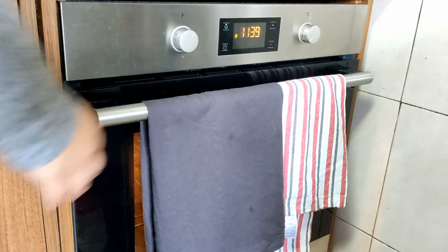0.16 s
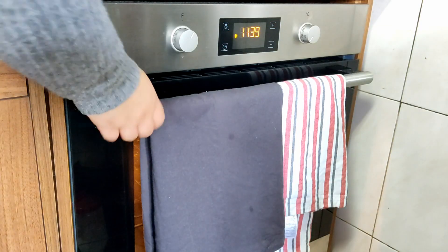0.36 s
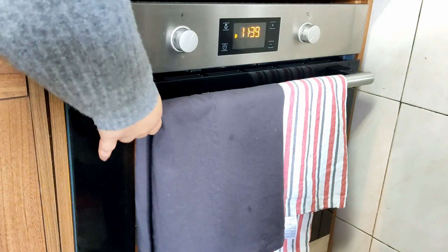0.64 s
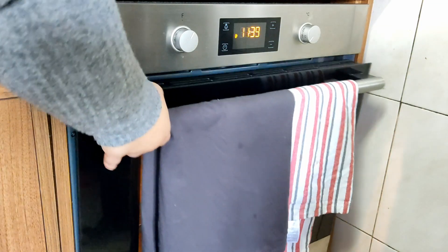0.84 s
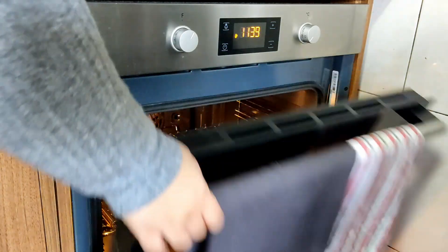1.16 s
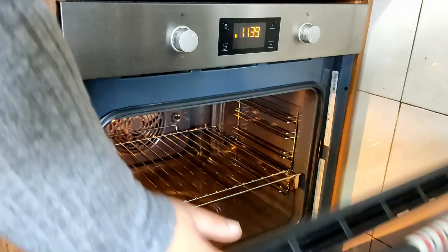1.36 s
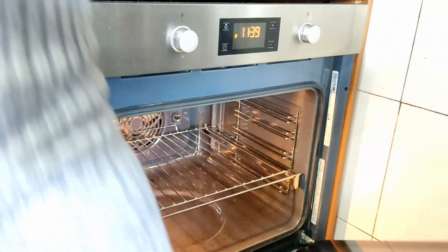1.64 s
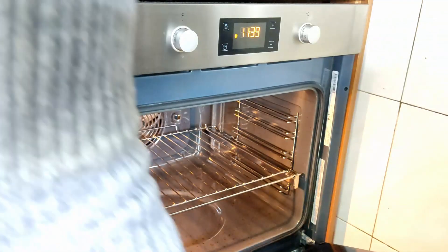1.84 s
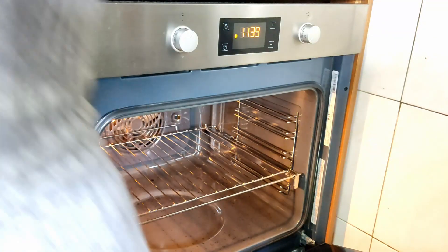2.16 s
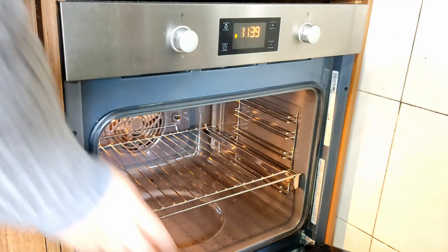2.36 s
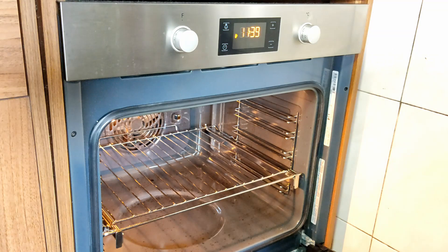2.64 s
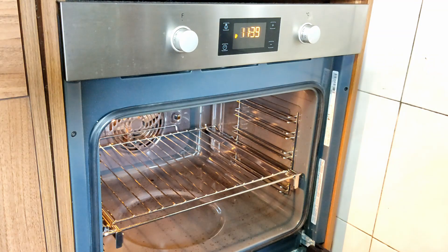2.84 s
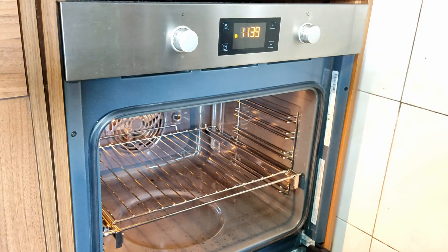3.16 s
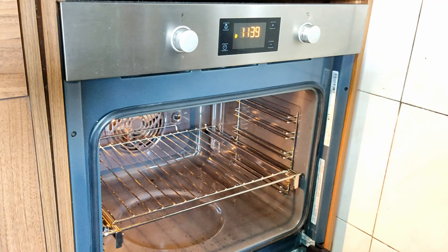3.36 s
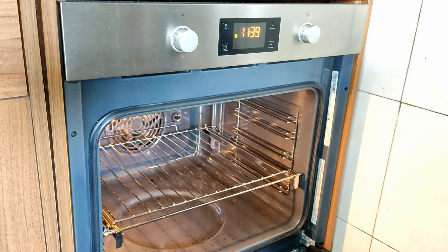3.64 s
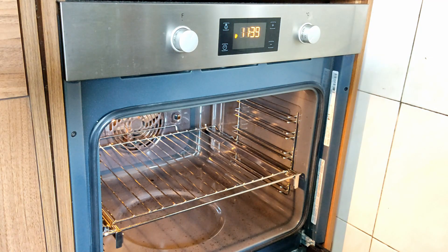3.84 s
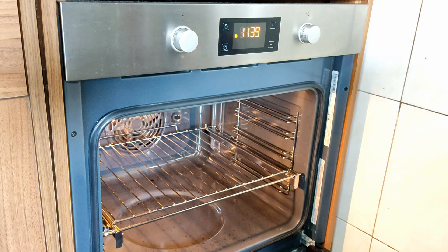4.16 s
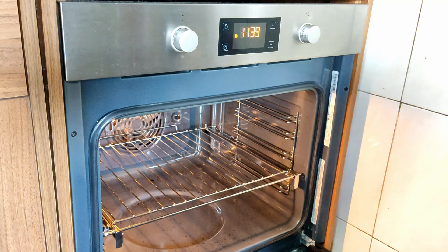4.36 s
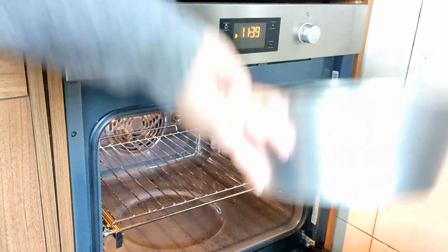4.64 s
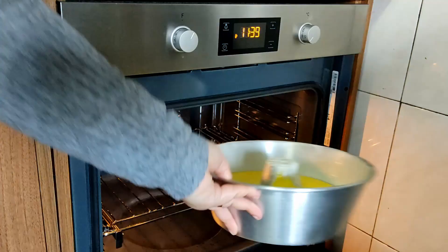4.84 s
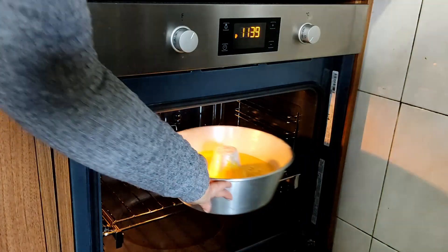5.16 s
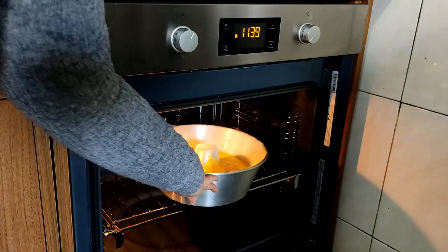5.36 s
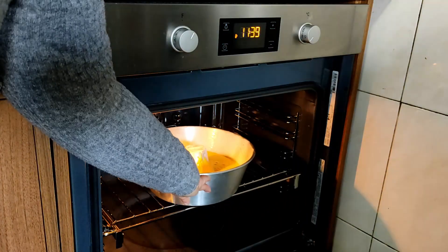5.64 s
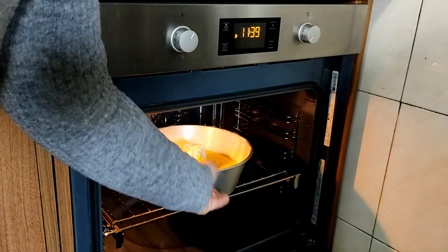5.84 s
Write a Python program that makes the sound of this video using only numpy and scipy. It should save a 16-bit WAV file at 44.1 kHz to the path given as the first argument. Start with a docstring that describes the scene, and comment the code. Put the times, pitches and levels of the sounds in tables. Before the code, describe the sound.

A quiet oven fan hums under rustling sleeves. After a light tap and a sharp grip on the handle, an oven door scrapes off its seal and falls heavily onto its stops, the loudest moment. Small clicks, scuffs and wooden bumps come and go. Near the end a heavy, filled metal tin is set on the rack in two short, damped clatters. Small microphone nearby, short bright room reverberation.

```python
"""A kitchen heard through a small two-port microphone, with an oven fan (coloured noise) and rustling cloth throughout.
After a light knock an oven door is gripped, rubs on its sprung hinge and drops onto its stops: noise bursts ring modes.
Clicks, soft scuffs (bands of noise), worktop knocks, cupboard thumps and a metal tick follow; the floor booms at times.
Last, a full cake tin lands twice on the wire rack. Decaying noise gives the tiled room's answer to blows and scuffs.
"""
import sys
import numpy as np
from scipy import signal
from scipy.fft import rfft, irfft, next_fast_len
from scipy.io import wavfile
from scipy.ndimage import uniform_filter1d

SR = 44100
rng = np.random.default_rng(int(sys.argv[2]) if len(sys.argv) > 2 else 0)


def transcribe(u):
    """Save the signal u as a 16-bit wav file named by the first command-line argument.

    u: samples, shape (n,) or (channels, n), limited to [-1, 1]; the rate is SR.
    q: integer samples, one column per channel.
    """
    v = np.clip(np.atleast_2d(u).T, -1, 1)
    q = np.round(v * 32767).astype(np.int16)
    wavfile.write(sys.argv[1], SR, q)


N = 264820  # length [samples]
# All levels are those at the source, ahead of the microphone's response.


def amp(db):
    """Decibel law: the amplitude gain of a level."""
    return 10 ** (np.asarray(db) / 20)


def unit(x):
    """Power normalisation: x scaled to rms 1."""
    return x / np.sqrt(np.mean(x ** 2) + 1e-20)


def along(points, hz, column=1):
    """Logarithmic frequency scale: a column of (frequency, value ..) points interpolated at hz."""
    points = np.asarray(points)
    return np.interp(np.log(hz + 1), np.log(points[:, 0] + 1), points[:, column])


def tilt(hz, slope_db):
    """Spectral slope: dB at hz for a slope per octave around 1 kHz, level below 100 Hz."""
    return slope_db * np.log2(np.maximum(hz, 100) / 1000)


def curve(rows):
    """Amplitude envelope: a (time [s], level [dB]) table as gain per sample, silent outside."""
    s, db = np.transpose(rows)
    return amp(np.interp(np.arange(N) / SR, s, db, left=-150, right=-150))


def filtered(x, response):
    """Linear filtering: the spectrum of x times a response of frequency."""
    n = x.shape[-1]
    padded = next_fast_len(n + 4096)
    spectrum = rfft(x, padded)
    return irfft(spectrum * response(np.fft.rfftfreq(padded, 1 / SR)), padded)[..., :n]


def paired(noises, spectrum, alike):
    """Interaural coherence: two unrelated noises, coloured, mixed to a left-right likeness."""
    def mid_side(hz):
        angle = np.arccos(np.clip(along(alike, hz), -1, 1)) / 2
        return amp(along(spectrum, hz)) * np.array([np.cos(angle), np.sin(angle)])

    mid, side = filtered(noises, mid_side)
    return np.array([mid + side, mid - side])


def rush(spectrum, alike, patchy_db):
    """Random modulation: stereo noise, rms 1, with patches of random gain in time and frequency."""
    z = signal.stft(rng.standard_normal((2, N + 512)), nperseg=512)[2]
    patches = uniform_filter1d(rng.standard_normal(z.shape[1:]), size=6, axis=0)
    patches = uniform_filter1d(patches, size=10, axis=1)
    noises = signal.istft(z * amp(patchy_db * unit(patches)), nperseg=512)[1][:, :N]
    return unit(paired(noises, spectrum, alike))


def ringing(modes, t, scatter_db, slope_db=0, wander=0):
    """Modal superposition: damped sines, nominal summed power 1 at the start, scattered anew each call."""
    hz, db, t60 = np.transpose(modes)[:, :, None]
    size = amp(db + tilt(hz, slope_db))
    chance = amp(scatter_db * rng.standard_normal(hz.shape))
    # a random walk of phase smears each mode over the share `wander` of its pitch
    steps = rng.standard_normal((len(hz), len(t)))
    drift = np.sqrt(2 * np.pi * wander * hz / SR) * np.cumsum(steps, axis=1)
    decay = amp(-60 * t / t60)
    ring = size * chance * decay * np.sin(2 * np.pi * hz * t + drift)
    return ring.sum(axis=0) / np.sqrt(np.sum(size ** 2) / 2)


# reverberation time of the room: (frequency [Hz], t60 [s])
ROOM_DECAY = [(60, 1), (300, 0.39), (1000, 0.4), (4000, 0.4), (10000, 0.32)]
# colour of the tail; a small room answers bass weakly: (frequency [Hz], relative level [dB])
ROOM_COLOUR = [(60, -8), (300, 5), (1000, -1.5)]
# coherence of diffuse sound: (frequency [Hz], left-right likeness [-1 to 1])
LIKENESS = [(60, 0.59), (180, 1), (550, 0.4), (1650, 0.0025), (5000, -0.028)]


def in_room(crack, ring, pan_db, wet_db, push=None):
    """Reverberation: direct sound plus a fresh noise tail, each frequency dying at its own speed."""
    hz, t, z = signal.stft(rng.standard_normal((2, len(crack))), SR, nperseg=256)
    decay = amp(-60 * t / along(ROOM_DECAY, hz)[:, None])
    tail = signal.istft(z * decay, SR, nperseg=256)[1]
    tail = paired(tail, ROOM_COLOUR, LIKENESS)
    tail = np.pad(tail / np.linalg.norm(tail[0]), ((0, 0), (round(.004 * SR), 0)))  # starts 4 ms late
    # ring and thud enter the room tail 10 dB lower, so their tones stay clear and steady
    sent = (crack if push is None else push) + amp(-10) * ring
    wet = signal.fftconvolve(sent[None], tail, axes=1)[:, :len(crack)]
    late_left = np.roll(crack + ring, shift=12)  # 12 samples later on the left
    direct = np.array([late_left, crack + ring]) * amp([[pan_db / 2], [-pan_db / 2]])
    return direct + amp(wet_db) * wet


WANDER = 0.025  # loose panels: smear as a share of pitch
# contact noise before the tilt: (frequency [Hz], relative density [dB per Hz])
CRACK_COLOUR = [(150, -39.5), (500, -4), (1000, 0.5), (2500, -7), (5000, -2), (9000, -1), (16000, -28)]
# modes of the cabinet carcass, the default under a blow: (frequency [Hz], relative level [dB], t60 [s])
CABINET_MODES = [(105.4, 7.5, 0.27), (121, -7.5, 0.16), (157.3, -5, 0.56)]


def blows(rows, modes, contact_s, wet_db, under=CABINET_MODES, top_hz=np.inf, wander=WANDER):
    """Impact excitation: a contact-long noise burst, the object's ring and a thud in what is under it.

    Rows: (time [s], crack, ring, thud [dB before their envelopes], hardness [dB/octave], left-right [dB]).
    """
    out = np.zeros((2, N + SR))
    t = np.arange(round(.55 * SR)) / SR
    swell = 1 - np.exp(-3 * t / contact_s)  # a long contact builds up gradually
    for s, crack_db, ring_db, thud_db, slope_db, pan_db in rows:
        def colour(hz):
            return amp(along(CRACK_COLOUR, hz) + tilt(hz, slope_db)) / (1 + (hz / top_hz) ** 6)

        noise = unit(filtered(rng.standard_normal(len(t)), colour))
        crack = amp(crack_db) * swell * np.exp(-t / contact_s) * noise
        # the walls get the crack's even colour as one pulse of equal energy
        push = filtered(1. * (np.arange(len(t)) == round(contact_s * SR)), colour)
        push *= np.linalg.norm(crack) / np.linalg.norm(push)
        ring = ringing(modes, t, scatter_db=2.2, slope_db=slope_db, wander=wander)
        thud = ringing(under, t, scatter_db=2.2, wander=2 * WANDER)
        body = amp(ring_db) * swell * ring + amp(thud_db) * swell ** 2 * thud
        start = round(s * SR)
        out[:, start:start + len(t)] += in_room(crack, body, pan_db, wet_db, push)
    return out[:, :N]


FAN_DB = -52.5  # rms level
# low hum and air noise of the fan: (frequency [Hz], relative density [dB per Hz])
FAN_COLOUR = [(20, -42), (36, 7), (43, 7), (52, -41), (71, -6), (160, -10), (200, 1), (245, -3.5),
              (450, -9), (665, -16), (826, -18.5), (1420, -42), (5000, -50), (16000, -60)]


def fan():
    """Flow noise: the oven fan as a narrow low hum and broad air noise."""
    return amp(FAN_DB) * rush(FAN_COLOUR, LIKENESS, patchy_db=2.0)


# clothing movement: (time [s], level [dB])
RUSTLE_LEVEL = [(0, -61.5), (.6, -60), (1.6, -57), (2.08, -65.5), (2.11, -54), (2.19, -53.5), (2.25, -64),
                (2.55, -61.5), (2.9, -52.5), (3.15, -58.5), (3.5, -53.5), (3.9, -60.5), (4.2, -57.5),
                (4.5, -60.5), (4.8, -57.5), (5.2, -64.5), (6, -64)]
# cloth friction: (frequency [Hz], relative density [dB per Hz])
CLOTH_COLOUR = [(300, -8), (1000, 3.5), (2000, -1.5), (4000, 4), (8000, 9), (16000, 2)]


def clothing():
    """Friction noise: a soft wide rustle that swells with each movement."""
    return curve(RUSTLE_LEVEL) * rush(CLOTH_COLOUR, LIKENESS, patchy_db=1.5)


# the floor takes weight: (time [s], level before the swell [dB])
FLOOR_LOADS = [(0.72, -39.5), (1.176, -31), (1.25, -23), (2.93, -42), (3.101, -42)]
# lowest mode of the floor: (frequency [Hz], relative level [dB], t60 [s])
FLOOR_MODE = [(49.7, 0, 0.35)]


def booms():
    """Low-frequency resonance: the floor swings slowly into its lowest mode, alike at both ports."""
    out = np.zeros(N + SR)
    t = np.arange(SR // 2) / SR
    swell = 1 - np.exp(-t / 0.013)
    for s, db in FLOOR_LOADS:
        start = round(s * SR)
        out[start:start + len(t)] += amp(db) * swell * ringing(FLOOR_MODE, t, scatter_db=1.5)
    return out[:N]


# soft rubs: (time [s], length [s], noise level before the swell [dB], centre [Hz], half-width [Hz])
SOFT_RUBS = [(2.083, 0.064, -70, 2720, 145), (2.19, 0.023, -65, 1470, 500),
             (2.406, 0.027, -65.5, 1150, 500), (2.432, 0.018, -60.5, 1440, 900),
             (2.865, 0.027, -55, 1600, 1500), (3.728, 0.094, -64.5, 1770, 1620),
             (3.978, 0.03, -65, 1930, 250), (3.979, 0.017, -56.5, 950, 300), (5.303, 0.024, -64, 2420, 690)]


def scuffs():
    """Band-limited friction: short soft swells of noise around a centre frequency."""
    out = np.zeros((2, N + SR))
    t = np.arange(SR // 2) / SR
    for s, length_s, db, centre_hz, width_hz in SOFT_RUBS:
        def band(hz):
            return np.exp(-((hz - centre_hz) / width_hz) ** 2)

        noise = unit(filtered(rng.standard_normal(len(t)), band))
        swell = np.sqrt(np.abs(np.sin(np.pi * np.minimum(t / length_s, 1))))
        rub = amp(db) * swell * noise
        start = round(s * SR)
        out[:, start:start + len(t)] += in_room(rub, 0 * t, pan_db=1.5, wet_db=-7)
    return out[:, :N]


CLICK_CONTACT_S, KNOCK_CONTACT_S, THUMP_CONTACT_S = 0.0033, .0035, 0.00303
KNOCK_TOP_HZ = 4600  # the crack on wood falls away steeply above this
KNOCK_WANDER = .01  # the worktop rings more cleanly than loose panels
THUMP_CRACK_DB, THUMP_THUD_DB = -15, -14.5  # relative to the ring
THUMP_HARD_DB = -7.5  # hardness [dB/octave]
# light knocks on the worktop: (time [s], crack [dB], ring [dB], hardness [dB/octave], left-right [dB])
WORKTOP_KNOCKS = [(.16, -49.5, -61, -9, 13), (1.844, -49, -57, -2, 13), (2.9158, -34.5, -42, 0, 6),
                  (2.921, -39, -31, -8.5, -4), (3.302, -46, -49, -16, 3), (3.31, -45.5, -44, -7, 4)]
# metal tick: columns as for the knocks
METAL_TICKS = [(4.581, -37.5, -42.5, 2.2, 9.1)]
# dry clicks: (time [s], crack [dB], hardness [dB/octave], left-right [dB])
DRY_CLICKS = [(1.775, -34, 5, 9), (1.782, -32, -0.5, 6), (1.790, -28, 6.5, 10.5),
              (3.179, -33.5, 28.5, 13.5), (3.899, -53.5, 8, -29), (4.584, -33.5, 20.5, 29),
              (4.592, -30.5, 26, 21), (5.006, -47, 2.5, -15), (5.202, -50.5, 10, 19),
              (5.309, -51.5, 2.5, -12)]
# dull blows on the cupboard: (time [s], ring [dB])
CUPBOARD_THUMPS = [(2.890, -25.5), (3.033, -33), (3.246, -38.5)]
# modes of worktop, small metal part and cupboard: (frequency [Hz], relative level [dB], t60 [s])
WORKTOP_MODES = [(826, -3, 0.11), (1035, -5.5, 0.063), (1348, -1, 0.051), (1777, -6, 0.075),
                 (2940, -8, .06), (4050, -6, 0.037)]
CLASP_MODES = [(1715, -4.5, 0.13), (2140, -7.5, 0.08), (5540, 6, 0.075)]
CUPBOARD_MODES = [(338, 3, 0.038), (480, 12, 0.022)]


def small_sounds():
    """Selective excitation: knocks ring the worktop, thumps the cupboard, a tick metal; clicks nothing."""
    none = -np.inf
    knocks = [(s, db, ring_db, none, slope_db, pan_db)
              for s, db, ring_db, slope_db, pan_db in WORKTOP_KNOCKS]
    clicks = [(s, db, none, none, slope_db, pan_db) for s, db, slope_db, pan_db in DRY_CLICKS]
    thumps = [(s, db + THUMP_CRACK_DB, db, db + THUMP_THUD_DB, THUMP_HARD_DB, 0)
              for s, db in CUPBOARD_THUMPS]
    ticks = [(s, db, ring_db, none, slope_db, pan_db)
             for s, db, ring_db, slope_db, pan_db in METAL_TICKS]
    out = blows(ticks, CLASP_MODES, CLICK_CONTACT_S, wet_db=6.0)
    out += blows(knocks, WORKTOP_MODES, KNOCK_CONTACT_S, wet_db=1.0,
                 top_hz=KNOCK_TOP_HZ, wander=KNOCK_WANDER)
    out += blows(clicks, WORKTOP_MODES, CLICK_CONTACT_S, wet_db=4.5)
    return out + blows(thumps, CUPBOARD_MODES, THUMP_CONTACT_S, wet_db=3.0)


TIN_CONTACT_S, TIN_PAN_DB, TIN_WANDER = 0.0045, 2.3, .01
# contacts of tin and rack: (time [s], crack [dB], ring [dB], thud [dB], hardness [dB/octave])
TIN_CONTACTS = [(5.517, -33, -40.5, -67, -1), (5.533, -29, -32, -60, -0.5), (5.552, -38.5, -33.5, -37, -9),
                (5.575, -41.5, -49, -38.5, -9.5), (5.597, -34.5, -37, -45, -1.5),
                (5.626, -59, -51, -45, -16), (5.645, -54, -53, -38.5, -9), (5.685, -42.5, -49, -51, 2.5),
                (5.746, -35, -35, -39, -0.5), (5.774, -30.5, -43.5, -36, 9), (5.801, -34, -43, -42, -20.5),
                (5.832, -44.5, -40.5, -43.5, -12), (5.858, -49, -53, -51, -10), (5.905, -47.5, -67, -63, 7)]
# modes of the full tin, then of the wire rack under it: (frequency [Hz], relative level [dB], t60 [s])
TIN_MODES = [(202, 4, 0.11), (327, 0.5, 0.095), (420.8, 7, 0.21), (452.5, 6.5, 0.26), (499, -1, 0.2),
             (709, 5, 0.15), (992, -3, 0.099), (1311.4, -2, 0.2), (1500, -1.5, 0.08), (1675, -3, .08),
             (1850, -5.5, 0.07), (2274, -5, 0.051), (4730, -6, 0.1)]
RACK_MODES = [(105, -13, 0.24), (124, 0, 0.18), (156, -2.5, 0.13), (244, -7.5, 0.11), (296, -3.5, 0.18)]


def tin():
    """Repeated impact: two landings, each a short clatter of contacts ringing tin and wire rack."""
    contacts = [(*row, TIN_PAN_DB) for row in TIN_CONTACTS]
    return blows(contacts, TIN_MODES, TIN_CONTACT_S, wet_db=5.5, under=RACK_MODES, wander=TIN_WANDER)


# rubbing of the hinge, then shudder of the door body: (time [s], level [dB])
HINGE_LEVEL = [(.68, -61), (.698, -41), (.76, -43), (.8, -46), (.86, -38), (.9, -45.5), (.96, -53),
               (1.03, -50), (1.1, -42.5)]
SHUDDER_LEVEL = [(.69, -72), (.722, -41), (.76, -41), (.8, -45.5), (.85, -43), (.9, -49.5), (.95, -55.5),
                 (1.0, -49.5), (1.09, -53)]
# colours of the rub and of the body: (frequency [Hz], relative density [dB per Hz])
RUB_COLOUR = [(60, -28), (200, -1), (400, -6), (1000, -11), (2000, -15.5), (4000, -11.5), (8000, -16.5),
              (16000, -28)]
BODY_COLOUR = [(60, -11), (130, -2), (250, -0.5), (420, -7), (650, -6), (880, -6.5), (1200, -39),
               (2500, -52)]


def hinge():
    """Friction noise: rubbing on hinge and seal, roughened by uneven slips; the body shudders along."""
    slips = amp(3.5 * unit(uniform_filter1d(rng.standard_normal((2, N)), size=200)))
    rub = unit(slips[0] * rush(RUB_COLOUR, LIKENESS, patchy_db=1.5))
    shudder = unit(slips[1] * rush(BODY_COLOUR, LIKENESS, patchy_db=1.5))
    return curve(HINGE_LEVEL) * rub + curve(SHUDDER_LEVEL) * shudder


GRIP_CONTACT_S, GRIP_PAN_DB = 0.0059, 0.5
DOOR_CONTACT_S, DOOR_PAN_DB, DOOR_WANDER = 0.0053, 4.5, .004
# hand on handle, then door blows: (time [s], crack [dB], ring [dB], thud [dB], hardness [dB/octave])
GRIP_CONTACTS = [(.365, -22.5, -49, -55, 5.5), (.369, -33, -38, -49, 0.5)]
DOOR_CONTACTS = [(.689, -37, -66, -63, -5), (.716, -34, -42.5, -47, -1), (0.812, -41, -50, -55, -1.5),
                 (.853, -33.5, -39, -53.5, -4), (1.02, -37, -54, -58, 0.5), (1.091, -25, -26, -63, -1),
                 (1.104, -25, -28.5, -52, -10.5), (1.151, -27.5, -30, -63, 0), (1.167, -31, -43, -32, -14),
                 (1.236, -28, -32, -63, 9), (1.241, -16.5, -47, -51, 2.5), (1.2474, -15.5, -11, -43, -3),
                 (1.2647, -34, -19.5, -19, -13.5), (1.279, -27.5, -38, -28, -7),
                 (1.306, -24, -40, -43, -15)]
# modes rung by the grip, then by the door blows: (frequency [Hz], relative level [dB], t60 [s])
CATCH_MODES = [(548, -3, 0.19), (655, -4, 0.27), (715, 0, 0.032), (823, -0.5, 0.36), (1100, -8, .1),
               (2410, -7, 0.12)]
DOOR_MODES = [(340, -11, 0.048), (401, 1.5, 0.15), (459.4, 1, 0.16), (523, 9.5, 0.019), (544, -8, 0.15),
              (733, -4.5, 0.088), (895, -15, 0.073), (997, -4, 0.14), (1130, -13, 0.22),
              (1300, -11.5, 0.099), (1806, -3, 0.087), (2460, -11, 0.093)]


def door():
    """Friction and impact: gripped, pulled off its seal, swung down and dropped onto the stops."""
    grips = [(*row, GRIP_PAN_DB) for row in GRIP_CONTACTS]
    drops = [(*row, DOOR_PAN_DB) for row in DOOR_CONTACTS]
    grip = blows(grips, CATCH_MODES, GRIP_CONTACT_S, wet_db=-1.0)
    drop = blows(drops, DOOR_MODES, DOOR_CONTACT_S, wet_db=0.25, wander=DOOR_WANDER)
    return grip + hinge() + drop


def scene():
    """Linear superposition: all sources in the kitchen add up."""
    return fan() + clothing() + booms() + scuffs() + small_sounds() + tin() + door()


TOP_HZ = 15780  # band limit
# response of the microphone ports: (frequency [Hz], left [dB], right [dB])
PORT_RESPONSE = [(20, -7, -18), (42, 1.5, -2), (156, 2, -3.5), (300, 3, -1), (700, 3.5, 0), (2115, 7, 4.5),
                 (4240, -4.5, -2.5), (5930, -5, -3), (7690, -6, 6), (8850, 3.5, -10), (9590, -8, -12),
                 (10200, -18, -20), (17000, -20, -19.5)]


def record(dry):
    """Transducer response: each port has its own treble resonance; nothing passes above the band limit."""
    def ports(hz):
        left, right = along(PORT_RESPONSE, hz, column=1), along(PORT_RESPONSE, hz, column=2)
        return amp([left, right]) * (hz < TOP_HZ)

    return filtered(dry, ports)


dry = scene()
out = record(dry)
transcribe(out)
```